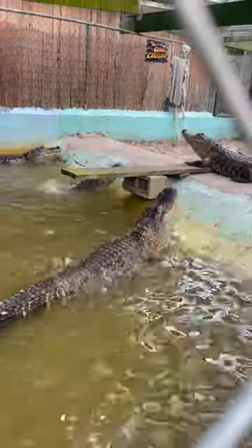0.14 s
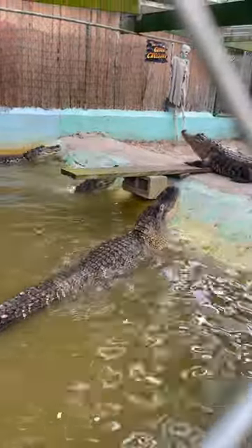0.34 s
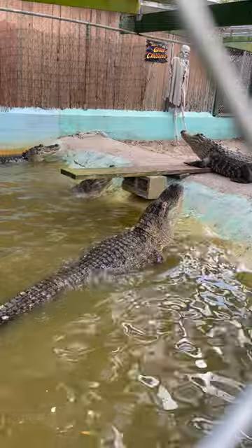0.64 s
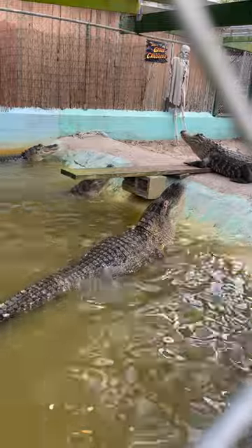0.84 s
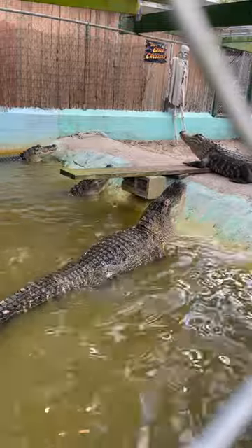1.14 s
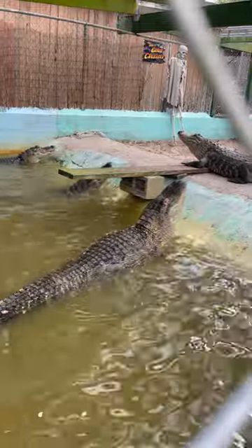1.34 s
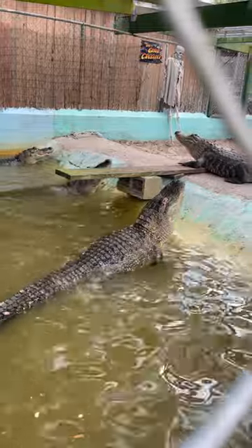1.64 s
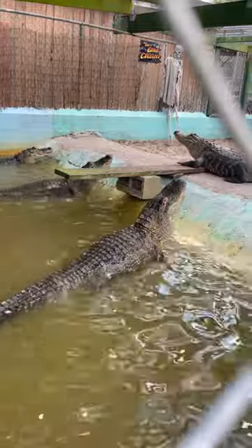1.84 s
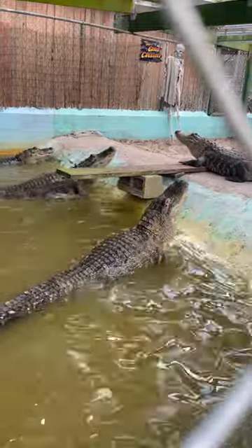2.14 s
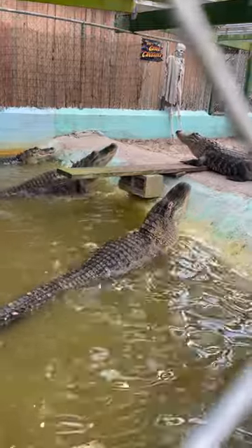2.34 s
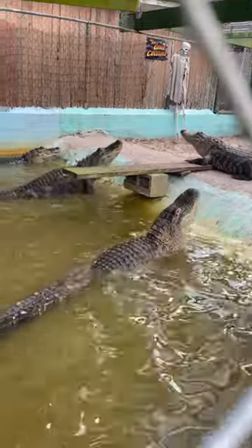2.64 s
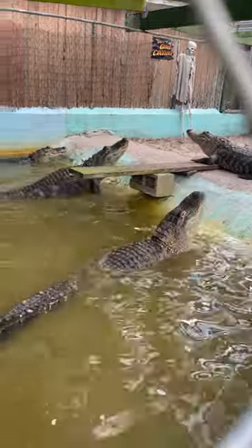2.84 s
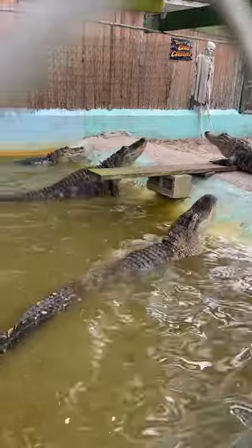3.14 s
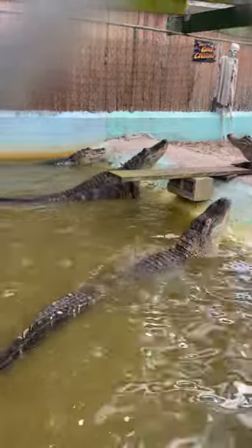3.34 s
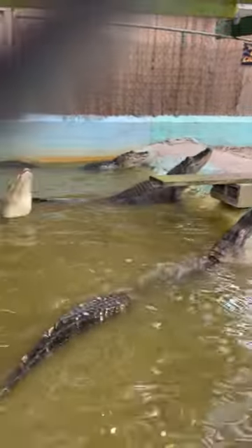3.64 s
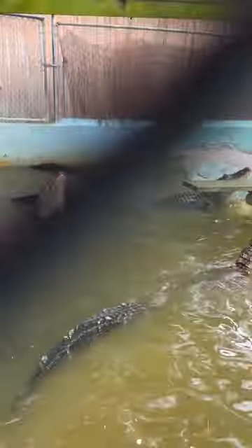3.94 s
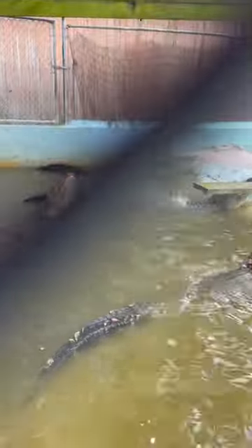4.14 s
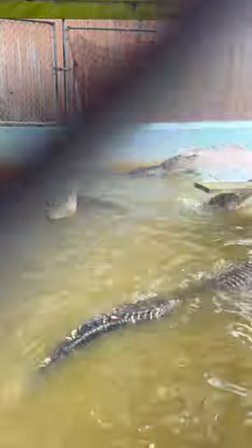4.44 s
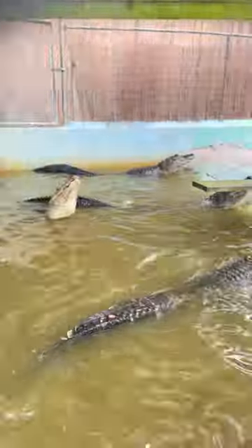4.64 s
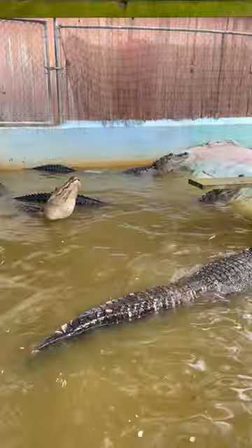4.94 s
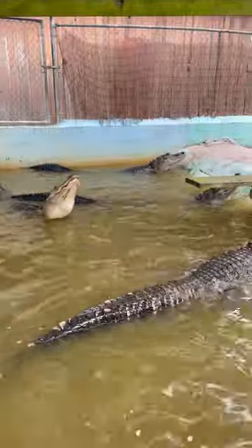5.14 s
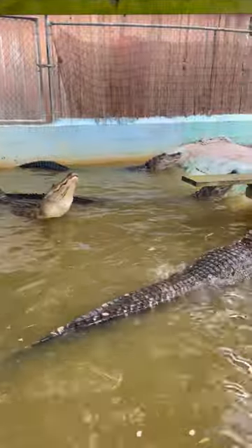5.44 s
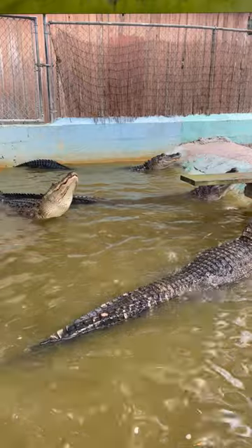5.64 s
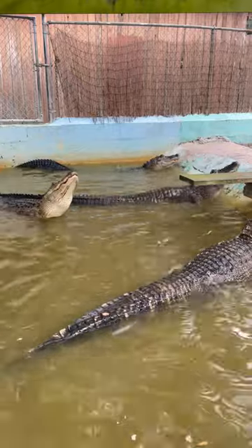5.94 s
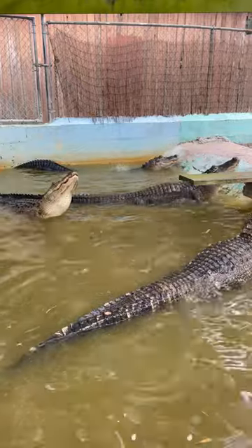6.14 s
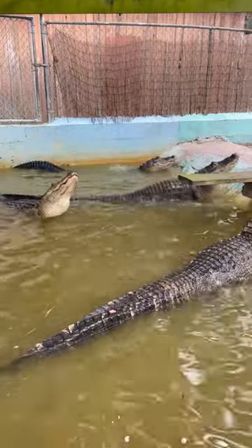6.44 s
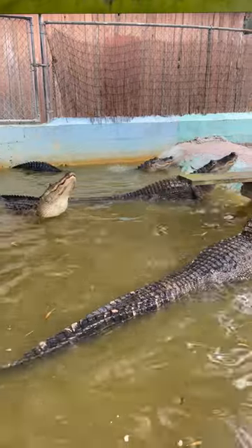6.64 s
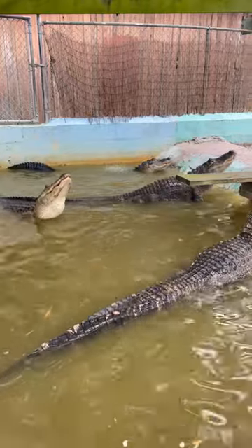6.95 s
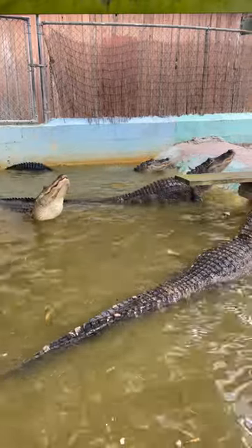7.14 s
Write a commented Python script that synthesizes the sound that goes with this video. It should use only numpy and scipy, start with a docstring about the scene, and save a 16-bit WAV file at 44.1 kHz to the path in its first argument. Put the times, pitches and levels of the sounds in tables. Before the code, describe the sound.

Large alligators bellow one after another: a loud, throaty, motor-like growl first, then a short quiet gap with lapping water and husky descending bird whistles, then three overlapping bellows, the first of them the roughest. Fine spray sizzles off their backs and hard throat pops thump. The end is calm, with drops, ripples and a faint swelling far growl. Outdoor stereo, fairly close, with slight echo from walls.

```python
"""A humming chest opens the scene, then alligators bellow in turn in a walled pool: slow glottal pulses,
in throbbing groups of two or three, ring the resonances of a long throat and sink in pitch as the air runs out.
The shaking backs throw up a sizzling spray, made of noise with brief coloured peaks and of damped bubble tones.
In the pauses water laps, a bird repeats a gliding whistle and a far animal rumbles; decaying noise forms the echo."""
import sys
import numpy as np
from scipy import signal
from scipy.fft import rfft, irfft, next_fast_len
from scipy.io import wavfile
from scipy.ndimage import uniform_filter1d, minimum_filter1d, map_coordinates

SR = 44100
rng = np.random.default_rng(int(sys.argv[2]) if len(sys.argv) > 2 else 0)


def master(y):
    """Save y as 16-bit WAV."""
    cut = np.clip(np.atleast_2d(y).T, -1, 1)
    pcm = np.round(cut * 32767)  # scale
    wavfile.write(sys.argv[1], SR, pcm.astype(np.int16))


N = 322371

# Resonances of the nearest animal's throat: [f/Hz, width/Hz, relative level/dB]
NEAR_THROAT = [(96, 49, -1.5), (173.7, 50.7, 2), (236.6, 50.5, -3.5), (354, 87, -17), (725, 28, -9.5),
               (880, 55, -18)]
# Spectrum of splashing water: [f/Hz, relative level per Hz/dB]
WATER_SPECTRUM = [(300, -24), (800, 0.5), (1800, -3.5), (4200, -1), (6500, -7), (8800, -4), (10000, -23),
                  (16000, -20)]


def amp(db):
    """The level definition: 20 dB is a tenfold amplitude."""
    return 10 ** (np.asarray(db) / 20)


def unit(x):
    """Energy normalisation: x at rms 1."""
    return x / np.sqrt(np.mean(x ** 2) + 1e-20)


def even(x, span=0.11):
    """Running energy normalisation: x at an rms near 1 over every span of seconds."""
    energy = np.abs(uniform_filter1d(x ** 2, int(span * SR)))
    return x / np.sqrt(energy + 1e-3 * np.mean(x ** 2))


def along(points, hz):
    """Interpolation of (f/Hz, value) points on a logarithmic frequency axis."""
    f, v = np.transpose(points)
    return np.interp(np.log(hz + 1), np.log(f + 1), v)


def clock():
    """Uniform sampling: the time of each sample in seconds."""
    return np.arange(N) / SR


def swell(u):
    """A half-sine envelope over u from 0 to 1."""
    return np.abs(np.sin(np.pi * np.clip(u, 0, 1)))


def wobble(rate):
    """Slow random modulation: a smooth curve through rate random knots a second."""
    knots = rng.standard_normal(int(N * rate / SR) + 4)
    return map_coordinates(knots, [np.arange(N) * rate / SR], order=2)


def filtered(x, response):
    """Linear filtering: the spectrum of x times a complex response of frequency."""
    m = next_fast_len(N + SR // 4)
    return irfft(rfft(x, m) * response(np.fft.rfftfreq(m, 1 / SR)), m)[..., :N]


def coloured(x, spectrum):
    """Spectral shaping: x weighted by the given spectrum, at rms 1."""
    return unit(filtered(x, lambda hz: amp(along(spectrum, hz))))


def ring(x, modes):
    """Modal resonance: x drives parallel resonators of alternating sign."""
    out = np.zeros(N)
    for k, (hz, width, db) in enumerate(modes):
        b, a = signal.iirpeak(hz, hz / width, SR)
        out += (-1) ** k * amp(db) * signal.lfilter(b, a, x)
    return out


def passed(x, hz, kind, order=4):
    """Butterworth filtering: a causal low-pass or high-pass."""
    return signal.sosfilt(signal.butter(order, hz, kind, fs=SR, output="sos"), x)


def strikes(times, sizes):
    """Impulsive excitation: single-sample blows of the given sizes."""
    return np.bincount(np.clip(times * SR, 0, N - 1).astype(int), sizes, N)


def linger(x, life):
    """Exponential decay: each impulse of x dies away with a time constant of life seconds."""
    return signal.lfilter([1], [1, -np.exp(-1 / (life * SR))], x)


def bubbles(times, sizes, hz, cycles):
    """Bubble resonance: damped tones that rise a little as each bubble nears the surface."""
    t = np.arange(int(4 * cycles / np.median(hz) * SR)) / SR
    age = t * hz[:, None] / cycles  # in decay times
    envelope = np.exp(-age) * (1 - np.exp(-6 * age))
    tones = sizes[:, None] * envelope * np.sin(2 * np.pi * cycles * age * (1 + .04 * age))
    at = (times[:, None] * SR).astype(int) + np.arange(len(t))
    return np.bincount(at.ravel(), tones.ravel(), N)[:N]


def patter(count, centre_hz, spread, cycles, scatter_db):
    """Random superposition: a rain of small bubbles, a few much louder than the rest."""
    u = rng.random((count, 2))
    hz = np.clip(centre_hz * np.exp(spread * rng.standard_normal(count)), 300, 12000)
    sizes = amp(-scatter_db * np.log(u[:, 1] + 0.021))
    return unit(bubbles(u[:, 0] * N / SR, sizes, hz, cycles))


def bubbling(x, patch_db, width_hz=420, life=.022):
    """Time-frequency modulation: brief, narrow peaks of random strength colour each burst of wet spray."""
    z = signal.stft(x, nperseg=256)[2]
    knots_per_bin = SR / 256 / width_hz
    knots_per_frame = 128 / SR / life
    rows, columns = np.indices(z.shape) * np.array([knots_per_bin, knots_per_frame])[:, None, None]
    knots = rng.standard_normal((int(rows.max()) + 3, int(columns.max()) + 3))
    gain = unit(amp(patch_db * map_coordinates(knots, [rows, columns], order=1)))
    return signal.istft(z * gain, nperseg=256)[1][:N]


def walls(x):
    """Reverberation: the echo of pool rim and fence is a noise tail that decays at each band's own rate."""
    # Decay time of the enclosure: [f/Hz, t60/s]
    decay_times = [(100, 0.29), (1000, 0.67), (4000, 0.29), (12000, 0.014)]
    hz, t, z = signal.stft(rng.standard_normal(SR // 2), SR, nperseg=256)
    decay = amp(-60 * t / along(decay_times, hz)[:, None])
    tail = signal.istft(z * decay, SR, nperseg=256)[1]
    delayed = np.pad(x, (400, 0))  # samples, about 9 ms
    return signal.fftconvolve(delayed, tail / np.linalg.norm(tail))[:N]


def alligators():
    """Source and filter: four bellows in turn; the second, from the nearest animal, throbs the hardest."""
    # One arch of lung pressure each: [start t/s, crest t/s, end t/s, sag time/s, crest pitch before the scoop f/Hz,
    # levels at full pressure of chest, voice, open throat, spray/dB, onset time/s]
    bellows = [(0.14, 0.45, 1.55, 1.135, 65.24, -17.5, -13.2, -27, -31.5, 0.041),
               (2.69, 2.8, 3.52, 1.15, 56.12, -20, -15.5, -32.5, -30, 0.018),
               (3.28, 3.546, 4.42, 0.9, 66.37, -14.5, -13.5, -24.5, -31, 0.041),
               (4.29, 4.568, 5.67, 1.06, 65.66, -16.5, -12.5, -24.8, -30.3, 0.043)]
    # Throat resonances: [f/Hz, width/Hz, relative level/dB]
    long_throat = [(94.4, 31.7, 0), (142, 72, -3.5), (198.5, 18.5, 1.5), (300.5, 32, -13), (384.7, 26, -15),
                   (589, 22.2, -15.5), (706, 100, -27.5)]
    third_throat = [(93.3, 12.5, 4.5), (142, 63, -2.5), (208, 38.7, -1.5), (284, 37, -8), (341, 69, -12),
                    (446, 77, -17.5), (591.5, 33, -16)]
    # Upper resonances that the rushing air excites: [f/Hz, width/Hz, relative level/dB]
    long_rasp = [(916, 51, -6.5), (1405, 67, 5.5), (1860, 170, -5), (2234, 24, 2), (3330, 280, 1)]
    near_rasp = [(865, 90, -5.5), (1415, 115, 2), (1750, 170, -6), (2140, 250, -3.5), (2410, 39, -1.5),
                 (2930, 250, -4)]
    first = bellow(bellows[0], long_throat, long_rasp, per_throb=3.18, weak_db=-6, late=.0018,
                   jitter=.00012, rough=.2, rasp_db=-4.5, dip_db=-5.5, steady=.7)
    near = bellow(bellows[1], NEAR_THROAT, near_rasp, per_throb=2.4, weak_db=-3, late=.002,
                  jitter=.0006, rough=.35, rasp_db=0, dip_db=-15, steady=.8)
    third = bellow(bellows[2], third_throat, near_rasp, per_throb=3.26, weak_db=-6, late=.0018,
                   jitter=.0003, rough=.34, rasp_db=-1, dip_db=-3.5, steady=1)
    fourth = bellow(bellows[3], long_throat, long_rasp, per_throb=3.08, weak_db=-5, late=.0018,
                    jitter=.00018, rough=.24, rasp_db=-4, dip_db=-5, steady=.7)
    return first + near + third + fourth


def bellow(row, throat, rasp, per_throb, weak_db, late, jitter, rough, rasp_db, dip_db, steady):
    """Amplitude modulation: each throb shapes the voice, the rasping air and the spray off the back."""
    voice_choke = .35  # the voice dips between throbs by this share of the airflow's dip
    droplets_db = -6  # single droplets against the fine spray
    gate, pitch, chest_db, voice_db, open_db, water_db = breath(row)
    turns, throb, pulses = glottis(pitch, row[1], per_throb, weak_db, late, jitter, scatter_db=2.5)
    choke_db = dip_db * ((1 - throb) / 2) ** 2  # the airflow weakens between throbs
    pulsed = even(linger(linger(pulses, .012), 0.001))
    shake = amp(choke_db + 1.2 * wobble(110)) * (pulsed + steady)
    turbulence = bubbling(rng.standard_normal(N), patch_db=5.5)
    air = even(passed(rasping(shake * turbulence, rasp), 4000, "low"))
    droplets = patter(count=2400, centre_hz=4600, spread=.22, cycles=8, scatter_db=3)
    spray = even(shake * (sizzle() + amp(droplets_db) * droplets))
    growl = voice(turns, pulses, pitch, throat, chest_db, voice_db, open_db, rough)
    growl = unit(amp(voice_choke * choke_db)) * growl
    partials = singing(turns, row[0], row[2])
    return gate * (growl + partials + amp(water_db) * (amp(rasp_db) * air + spray))


def breath(row):
    """Pressure-controlled phonation: pitch and levels follow the lung pressure as it arches and sags."""
    # Responses of chest, voice, open throat and spray:
    # [attack/onset times, loss at half pressure/dB, steepness of that loss/1]
    responses = [(2.3, 9, 1.7), (0.82, 8, 2), (0.6, 10.5, 3.8), (1.04, 15, 2.16)]
    rise_share = .75  # the pressure builds in this share of its sag time
    scoop_share, scoop_s = .17, 0.0793  # each bellow slides up to its pitch from this share below
    slowest_hz, pitch_waver = 26.1, 0.00902  # pulse rate floor before the waver; waver as a share of pitch
    release_s = .12  # the throat closes
    start, crest, end, sag, crest_hz, *crest_db, onset = row
    t = clock()
    pressure = np.exp(-((t - crest) / np.where(t < crest, rise_share * sag, sag)) ** 2)
    gate = np.clip((end - t) / release_s, 0, 1) * (t > start)
    age = np.maximum(t - start, 1 / SR)
    levels = []
    for db, (attack, loss_db, steepness) in zip(crest_db, responses):
        onset_db = 20 * np.log10(1 - np.exp(-age / (attack * onset)))
        levels.append(db + onset_db - loss_db * (2 * (1 - pressure)) ** steepness)
    scoop = 1 - scoop_share * np.exp(-age / scoop_s)
    pitch = np.maximum(crest_hz * pressure * scoop, slowest_hz) * (1 + pitch_waver * wobble(14))
    return gate, pitch, *levels


def glottis(pitch, crest, per_throb, weak_db, late, jitter, scatter_db):
    """Subharmonic modulation: cycle count, throb from -1 to 1, and pulses weak and late in its troughs."""
    turns = np.cumsum(pitch) / SR
    turns = turns - turns[int(crest * SR)]  # the throb is highest at the crest
    throb = np.cos(2 * np.pi * turns / per_throb)
    at = np.flatnonzero(np.diff(np.round(turns)))
    chance = rng.standard_normal((len(at), 2))
    drive = np.clip(2 * pitch[at] / pitch.max() - 1, 0, 1)  # the pulses even out at low pitch
    trough = drive * ((1 - throb[at]) / 2) ** 2
    times = at / SR + late * trough + jitter * chance[:, 0]
    return turns, throb, strikes(times, amp(weak_db * trough + scatter_db * chance[:, 1]))


def voice(turns, pulses, pitch, throat, chest_db, voice_db, open_db, rough,
          split_hz=275, wet_db=-8, tighten_hz=16):
    """Source-filter theory: the chest hums; pulses and their turbulence ring the throat and the pool rim."""
    flutter = rough * unit(passed(rng.standard_normal(N), 160, "low"))
    hum = np.sin(2 * np.pi * turns) + 0.41 * np.sin(4 * np.pi * turns) + .5 * flutter
    chest = np.sqrt(2) * passed(passed(hum, 52, "high"), 85, "low") * amp(1.2 * wobble(25))
    spent = np.clip((.92 - pitch / pitch.max()) / 0.17, 0, 1)  # 1 where the pitch is well below its peak
    puffs = unit(linger(pulses, 0.027) * rng.standard_normal(N))
    flow = unit(pulses) + rough * puffs
    # at low pitch the resonances shift by tighten_hz and the lowest ones fade
    tight = passed(ring(flow, np.array(throat) + [tighten_hz, 0, 0]), 146, "high", order=2)
    tone = passed((1 - spent) * ring(flow, throat) + spent * tight, 73.3, "high")
    tone = tone + amp(wet_db) * walls(tone)
    low = passed(tone, split_hz, "low", order=6)
    high = passed(tone, split_hz, "high", order=6)
    open_throat = even(passed(high, 703, "low"))
    return amp(chest_db) * chest + amp(voice_db) * even(low) + amp(open_db) * open_throat


def singing(turns, start, end, drift=0.23):
    """Harmonic locking: single partials lock onto the throat and sing out, bending with the pitch."""
    # Clear partials: [start t/s, length t/s, multiple of the pitch/1, level/dB]
    partials = [(0.243, 0.13, 2, -23), (0.307, 0.51, 3, -11), (0.848, 0.36, 4, -16.5),
                (0.916, 0.13, 6, -30), (3.31, 0.36, 3, -15), (3.776, 0.14, 5, -23.5),
                (3.947, 0.31, 2, -19.5), (4.341, 0.28, 2, -21.5), (4.433, 0.53, 3, -11),
                (4.929, 0.15, 4, -25)]
    out = np.zeros(N)
    for s, length, multiple, db in partials:
        if start < s + length / 2 < end - 0.1993:  # only partials centred within this bellow
            phase = 2 * np.pi * round(multiple) * turns + drift * wobble(12)
            out += amp(db) * swell((clock() - s) / length) ** 0.84 * np.sin(phase)
    return np.sqrt(2) * out * amp(0.5 * wobble(30))


def rasping(x, modes):
    """Resonance of turbulence: x through upper resonances whose strengths drift against each other."""
    waver_db, waver_hz = 3, 9  # size of the drift and its knots a second
    knots = np.arange(0, N, SR / waver_hz)
    out = np.zeros(N)
    for k, mode in enumerate(modes):
        drift = np.interp(np.arange(N), knots, rng.standard_normal(len(knots)))
        out += (-1) ** k * amp(waver_db * drift) * ring(x, [mode])
    return out


def sizzle():
    """Granular noise: fine droplets dance on a shaking back in a dense, bubbling crackle at rms 1."""
    # Spectrum of the spray: [f/Hz, relative level per Hz/dB]
    spray_spectrum = [(1000, -16), (2000, -7.5), (2700, -15.5), (3300, -7), (4700, -4), (6300, -4.5),
                      (7500, -7), (9000, -6), (10200, -33.5), (16000, -17.5)]
    crackle = rng.standard_normal(N) * amp(2 * wobble(900))
    return coloured(bubbling(crackle, patch_db=5.8), spray_spectrum)


def flares():
    """Resonant turbulence: within the bellows, air briefly rings one narrow throat resonance."""
    # Hoarse flares: [start t/s, length t/s, f/Hz, level/dB]
    flare_events = [(0.309, .19, 386, -22), (0.563, 0.17, 386, -23.5), (1.204, 0.12, 290, -25.5),
                    (0.962, 0.24, 588, -32.5), (3.43, .16, 463, -23.5), (3.646, 0.15, 599, -26),
                    (3.89, .13, 460, -27), (4.0, .22, 295, -24.5), (4.029, 0.17, 385, -28),
                    (4.48, .17, 395, -21.5), (4.655, 0.099, 386, -20), (4.782, 0.19, 378, -21.5),
                    (5.109, 0.27, 295, -24.5), (4.963, 0.535, 620, -33)]
    out = np.zeros(N)
    for s, length, hz, db in flare_events:
        mode = [(hz, 68, 0)]  # width in Hz of each of the two passes
        tone = even(ring(ring(rng.standard_normal(N), mode), mode))
        out += amp(db) * swell((clock() - s) / length) * tone
    return out


def hums(overtone_db=-23):
    """Forced vibration: the chest shudders with the throat closed and lifts a little spray."""
    # Chest hums: [start t/s, length t/s, f/Hz, chest level/dB, spray level/dB]
    hum_events = [(-0.08, 0.33, 58.9, -20.5, -41.5), (4.187, 0.2, 68.2, -19, -49),
                  (6.932, 0.13, 72.4, -26.5, -75)]
    t, spray, out = clock(), sizzle(), np.zeros(N)
    for s, length, hz, chest_db, spray_db in hum_events:
        tone = unit(np.sin(2 * np.pi * hz * t) + amp(overtone_db) * np.sin(4 * np.pi * hz * t))
        out += swell((t - s) / length) ** .5 * (amp(chest_db) * tone + amp(spray_db) * spray)
    return out


def gulp(rough=0.41, alternate=0.67, air_db=-8, spray_db=-31):
    """Period doubling: a rough tone drops as the throat fills, every other cycle weak, and air churns."""
    start_s, length_s, level_db = 2.596, .13, -17
    from_hz, to_hz, fall_s = 215, 103.4, 0.019
    age = np.maximum(clock() - start_s, 0)
    turns = np.cumsum(to_hz + (from_hz - to_hz) * np.exp(-age / fall_s)) / SR
    uneven = 1 + alternate * np.cos(np.pi * turns) + rough * wobble(200)
    tone = unit(np.cos(2 * np.pi * turns) * uneven)
    air = even(passed(ring(rng.standard_normal(N), NEAR_THROAT), 450, "low"))
    spray = coloured(rng.standard_normal(N), WATER_SPECTRUM)
    envelope = swell(age / length_s) ** .5
    return amp(level_db) * envelope * (tone + amp(air_db) * air + amp(spray_db) * spray)


def thumps(times, peak_db, modes):
    """Impulse response: single soft blows on resonances, scaled so the highest peak meets its level."""
    x = passed(ring(strikes(times, amp(peak_db)), modes), 566, "low")
    x = passed(x, 50, "high", order=2)
    return x * amp(peak_db.max()) / np.abs(x).max()


def pops(thump_db=-2, splash_db=-1.0):
    """Transient excitation: hard closures thump the throat and fling water; a bump and a thud ring hollow."""
    # Single hard pops: [t/s, relative thump level/dB, relative splash level/dB]
    pop_events = [(0.337, -6.5, -30.5), (0.488, -7.5, -21.5), (0.539, -8, -25), (.795, -8, -26.5),
                  (.844, -11, -24), (0.901, -11, -24.5), (1.134, -21.5, -36), (2.594, -6.5, -31.5),
                  (2.708, -17.5, -26.5), (2.755, -6, -27.5), (2.788, -3, -24.5), (2.835, -9.5, -23),
                  (2.92, -6.5, -17.5), (2.964, -10.5, -19.5), (3.012, -7.5, -22.5), (3.147, -4.5, -21.5),
                  (3.362, -6, -21), (3.427, -2.5, -22.5), (3.684, -0.5, -24.5), (5.119, -2, -27.5),
                  (5.186, -1, -25.5), (5.4, -13, -35.5)]
    # A hollow bump in the pool, then a thud as the far animal's growl sets in again after its break: [t/s,
    # relative level/dB]
    bump_and_thud = [(7.082, -19.5), (7.213, -26)]
    # Resonances of bump and thud: [f/Hz, width/Hz, relative level/dB]
    hollow_modes = [(101.5, 12, 9), (379, 32, 0.5)]
    s, peak_db, water_db = np.transpose(pop_events)
    splash = linger(strikes(s, amp(water_db + splash_db)), .008) * sizzle()
    throat_thumps = amp(thump_db) * thumps(s, peak_db, NEAR_THROAT[:4])
    return throat_thumps + splash + thumps(*np.transpose(bump_and_thud), hollow_modes)


def far_alligator(attack=0.07):
    """Low-frequency propagation: only a low throb crosses the pool; it swells, rises and breaks off a moment."""
    # Throat resonances of the far animal: [f/Hz, width/Hz, relative level/dB]
    far_throat = [(104.6, 9.8, -8), (182, 30, -29), (267, 38, -17.5), (367, 41, -12.5), (598, 25, -27)]
    start_s, start_hz, rise_hz_per_s = 5.7, 50.14, 16
    swell_db_per_s, throb_db = 8.5, 3
    break_s, break_length_s = 7.13, 0.07
    age = np.maximum(clock() - start_s, 0)
    pitch = start_hz + rise_hz_per_s * age
    turns, throb, pulses = glottis(pitch, crest=6.7, per_throb=3, weak_db=-30, late=0.0075,
                                   jitter=.00015, scatter_db=.7)
    # levels before the swell and throb
    growl = voice(turns, pulses, pitch, far_throat, chest_db=-38.5, voice_db=-41.5, open_db=-58,
                  rough=1.0, split_hz=187.0, tighten_hz=-4.0)
    gate = np.minimum(age / attack, 1) * (1 - swell((clock() - break_s) / break_length_s) ** 2)
    return gate * amp(swell_db_per_s * age + throb_db * throb) * growl


def water(drop_db=-4, splat_db=-8, chirp_db=-2):
    """Bubble acoustics: wavelets lap at the rim in wash, gurgles and rising chirps; drops splat and ring."""
    # Wavelets that break on the rim: [t/s, wash level/dB, bubble level/dB], before rise and fade
    laps = [(1.58, -55, -61), (1.909, -41.5, -49.5), (2.198, -62, -65.5), (5.969, -45, -48.5),
            (6.339, -54, -54), (6.55, -61, -63), (6.8, -63, -66), (7.05, -55.5, -72)]
    # Larger drops: [t/s, relative level/dB, f/Hz]
    drops = [(1.9455, -35, 3450), (2.2228, -38, 1600), (6.0, -33, 4040), (6.025, -35, 4400),
             (6.0576, -25, 1430), (6.083, -33, 4900), (6.109, -30, 4060), (6.118, -32, 1200),
             (6.162, -34, 1510), (6.364, -35, 2310), (6.414, -34, 1140), (6.569, -38, 1340),
             (6.83, -31, 3420), (6.9541, -38, 1970), (7.0374, -36, 912), (7.078, -37, 926)]
    # Spectrum of a splat: [f/Hz, relative level per Hz/dB]
    splat_spectrum = [(500, -18), (1300, -8), (2600, 0), (4200, 2.5), (5800, -3.5), (8000, -14),
                      (11000, -33)]
    rise_s, fade_db_per_s = 0.027, 29
    wash_level, bubble_level = np.zeros((2, N))
    for s, wash_db, bubble_db in laps:
        age = np.maximum(clock() - s, 0)
        lap = np.minimum(age / rise_s, 1) * amp(-fade_db_per_s * age)
        wash_level += amp(wash_db) * lap
        bubble_level += amp(bubble_db) * lap
    ripple = rng.standard_normal(N) * amp(2.5 * wobble(60) + 3 * wobble(700))
    wash = coloured(bubbling(ripple, patch_db=6), WATER_SPECTRUM)
    gurgle = patter(count=600, centre_hz=1700, spread=.55, cycles=11, scatter_db=4)
    chirps = patter(count=130, centre_hz=1250, spread=.3, cycles=20, scatter_db=2)
    s, peak_db, hz = np.transpose(drops)
    splat_noise = even(coloured(bubbling(rng.standard_normal(N), patch_db=5), splat_spectrum), .02)
    splats = linger(strikes(s, amp(peak_db + splat_db)), 0.004) * splat_noise
    ringing = bubbles(s, amp(peak_db + drop_db), hz, cycles=15)
    return wash_level * wash + bubble_level * (gurgle + amp(chirp_db) * chirps) + splats + ringing


def birds(start_hz=3500, end_hz=2650, fall=0.051, length=0.1, blur=0.038, upper_ratio=1.27,
          upper_db=-5, count=5):
    """Frequency modulation: a husky falling whistle repeats in two voices; farther birds hold thin notes."""
    # Thin far notes: [start t/s, length t/s, f/Hz, level/dB]
    thin_notes = [(1.502, 0.057, 5700, -52), (1.64, 0.22, 5130, -60), (2.26, 0.25, 1770, -56),
                  (2.3, 0.33, 5200, -66), (5.565, 0.32, 1710, -59), (5.625, 0.37, 4980, -63.5)]
    whistle_s, every_s, whistle_db = 1.29, .306, -44.5
    t, out = clock(), np.zeros(N)
    age = (t - whistle_s) % every_s
    calling = (t > whistle_s) & (t < whistle_s + count * every_s)
    hz = end_hz + (start_hz - end_hz) * np.exp(-age / fall)
    for ratio, db in [(1, 0), (upper_ratio, upper_db)]:
        husky = np.sin(2 * np.pi * np.cumsum(ratio * hz * (1 + blur * wobble(900))) / SR)
        out += amp(whistle_db + db) * calling * swell(age / length) ** .5 * husky
    waver = np.cumsum(1 + .016 * wobble(400)) / SR  # unsteady time, in seconds
    for s, span, hz, db in thin_notes:
        out += amp(db) * swell((t - s) / span) * np.sin(2 * np.pi * hz * waver)
    return out


def outdoors(db=-42):
    """Ambient noise: a distant rumble and hiss of nearly steady level."""
    # Spectrum of the open air: [f/Hz, relative level per Hz/dB]
    air_spectrum = [(25, -33.5), (55, -0.5), (110, -12.5), (200, -15), (400, -26.5), (1000, -29),
                    (3000, -40), (6000, -42), (8800, -41), (10500, -53), (16000, -52)]
    return amp(db + wobble(12)) * coloured(rng.standard_normal(N), air_spectrum)


def scene():
    """Superposition and interaural coherence: all sources and echoes, with a diffuse part unlike left to right."""
    # Likeness of the two channels: [f/Hz, coherence/1]
    likeness = [(100, .999), (300, .993), (1000, .96), (2500, .91), (12000, .88)]
    pool = alligators() + flares() + hums() + gulp() + far_alligator() + pops() + water()
    song = birds()
    echo = amp(-13) * walls(passed(pool, 150, "high", order=2))
    far_song = amp(-3) * song + amp(-5) * walls(song)
    mid = pool + echo + far_song + outdoors()
    side = filtered(walls(mid), lambda hz: np.tan(np.arccos(np.clip(along(likeness, hz), 0, 1)) / 2))
    return np.array([mid + side, mid - side])


def record(dry):
    """Two-port reception: close ports differ in level and phase; a limiter and a band limit follow."""
    # Level difference of the ports: [f/Hz, left minus right level/dB]
    port_lean = [(60, -.5), (210, -2), (500, -3), (770, -5), (1170, -1.5), (1800, -2), (2700, 0),
                 (15000, 0)]
    # Phase difference of the ports: [f/Hz, lead of left over right/rad]
    port_lead = [(60, 0), (600, -.1), (1800, .1), (2760, 1.4), (3450, .4), (4900, .4), (6800, 1.9),
                 (9700, 3.1), (15000, 3.8)]
    top_hz = 15900  # nothing is kept above
    half = np.array([[.5], [-.5]])  # each port takes half of the difference
    x = filtered(dry, lambda hz: amp(half * along(port_lean, hz)) * np.exp(1j * half * along(port_lead, hz)))
    ceiling, hold = .92, SR // 100  # peak amplitude before the band limit; samples in 10 ms
    needed = ceiling / np.maximum(np.abs(x).max(axis=0), ceiling)
    gain = uniform_filter1d(minimum_filter1d(needed, 2 * hold), hold)
    return filtered(x * gain, lambda hz: hz < top_hz)


dry = scene()
out = record(dry)
master(out)
```